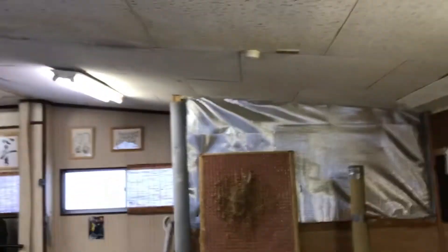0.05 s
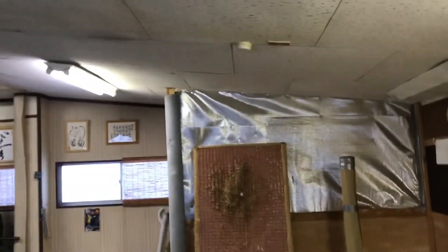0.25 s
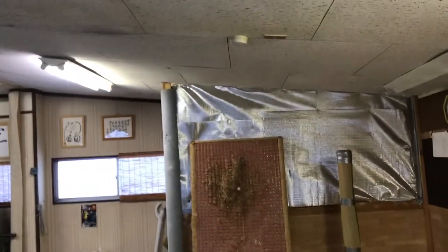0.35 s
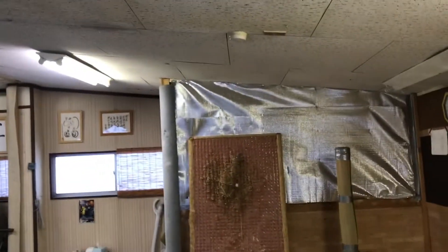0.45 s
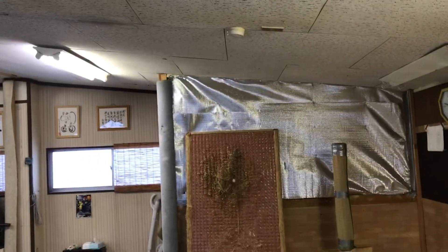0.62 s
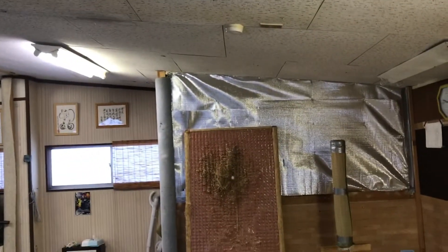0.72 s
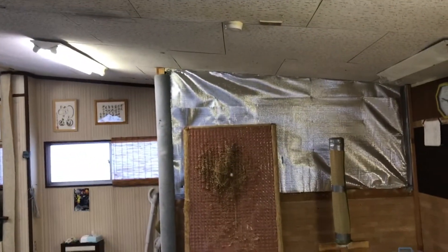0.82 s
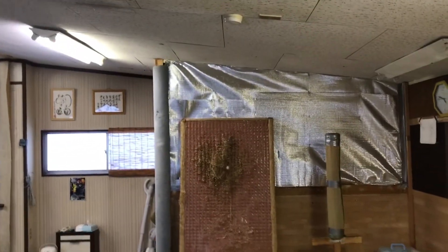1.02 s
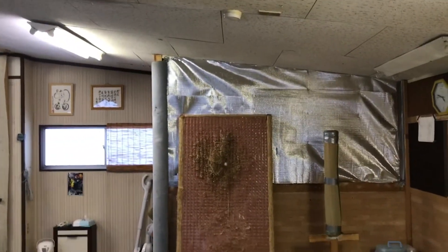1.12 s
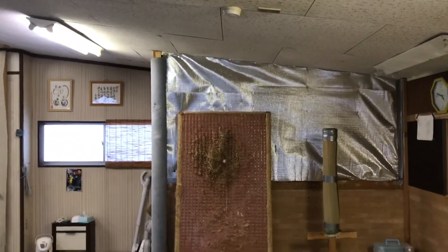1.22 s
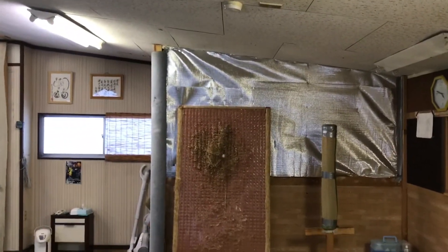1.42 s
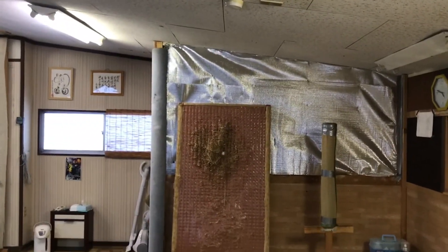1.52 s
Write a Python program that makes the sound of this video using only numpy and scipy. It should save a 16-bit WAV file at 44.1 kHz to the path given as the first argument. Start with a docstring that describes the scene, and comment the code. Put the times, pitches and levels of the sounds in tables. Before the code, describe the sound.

Blade impact on a wooden target, heard from the thrower's side of a small quiet room: faint release clink and swish, one dry crack with low thud, brief echo, then faint ticks, rustling and soft floor thumps.

```python
"""A small steel blade sticks in a padded wooden board across a quiet room: a splintery crack, then a hollow thud.
The crack is short bursts of noise; the thud is dying sine waves for the board and for the room's low boom.
Fading noise makes the short tail from the walls. Shaped noise makes the swish of the sleeve and a later rustle.
Mains hum, rumble and hiss lie underneath, with faint ticks, a clink at release and soft shifts of weight."""
import sys
import numpy as np
from scipy import signal
from scipy.fft import rfft, irfft
from scipy.io import wavfile
from scipy.ndimage import uniform_filter1d

SR = 44100
rng = np.random.default_rng(int(sys.argv[2]) if len(sys.argv) > 2 else 0)


def store_wav(level_fs):
    """Save 16-bit WAV to argv[1]."""
    pcm = np.round(np.clip(np.atleast_2d(level_fs), -1, 1) * 32767)
    wavfile.write(sys.argv[1], SR, pcm.T.astype(np.int16))


def natural_amplitude(level_db):
    """Convert a level in decibels to a linear amplitude factor, elementwise."""
    exponent = np.asarray(level_db, float) / 20
    return 10 ** exponent


N = 68355  # length of the scene [samples]
HIT_S = 0.2266  # the blade meets the board [s]

# Colour of the background air noise: (frequency [Hz], relative level per hertz [dB])
AIR_COLOUR = [(15, -48), (30, -1), (49, -1.5), (100, -5.5), (135, -9.5), (187, -5.5), (230, -9.5),
              (300, -13.5), (530, -19.5), (900, -23), (1500, -26.5), (4500, -33.5), (9500, -36),
              (12000, -33), (14000, -34.5), (15800, -25.5)]
# Slow swell of the bass in the air noise: (time [s], relative level [dB])
RUMBLE_SWELL = [(0, -14), (.08, -0.5), (.15, 2.5), (.5, -3), (.7, 1.5), (1.0, -1.5), (1.15, 4), (1.55, -4)]
# Mains hum, average level: (frequency [Hz], rms level [dB])
HUM_TONES = [(50, -68), (100, -68.5), (197, -74)]
# Colour of rubbing cloth: (frequency [Hz], relative level per hertz [dB])
CLOTH_COLOUR = [(120, -32), (200, -8.5), (311, 1), (480, -17), (900, -12.5), (1500, -12.5), (2000, -24.5),
                (3000, -16), (4300, -17.5), (5500, -25.5), (8100, -26.5), (16000, -20)]
# Swish of the throwing arm: (time [s], relative level [dB])
SLEEVE_CURVE = [(0.005, -61), (0.017, -69), (0.111, -70), (0.117, -67.5), (0.215, -74.5)]
# Clothes settling after the throw: (time [s], relative level [dB])
RUSTLE_CURVE = [(.85, -84), (.95, -82), (1.03, -69.5), (1.12, -74.5), (1.2, -89), (1.33, -74), (1.45, -82),
                (1.55, -81)]
# Thin high ticks: (time [s], relative level [dB])
TICK_TIMES = [(0.0749, -58), (0.3741, -51), (0.5018, -55), (0.9742, -52), (1.169, -59), (1.275, -52),
              (1.3992, -54), (1.438, -47)]
# Tones that make up each tick: frequency [Hz]
TICK_TONES_HZ = [10500, 12000, 13500, 14700, 15500]
# Ringing of the blade as it leaves the fingers: (frequency [Hz], level before the rise [dB], time to fall 60 dB [s])
CLINK_MODES = [(3830, -48, 0.0055), (6100, -40, 0.004)]
# Weight shifts on the floor: (time [s], level before the rise [dB], frequency [Hz])
WEIGHT_SHIFTS = [(0.457, -57.5, 94), (0.746, -55, 70), (1.27, -51.5, 84), (1.432, -54.5, 62.5)]
# Colour of the blow in the room: (frequency [Hz], relative level per hertz [dB])
TAIL_COLOUR = [(120, -24), (180, -3), (300, 3), (500, 1), (620, -7.5), (716, -3.5), (850, -11.5),
               (979, -24.5), (1500, -23.5), (1780, -30), (2200, -17.5), (2650, -26), (3050, -21.5),
               (4200, -32), (5100, -24.5), (5900, -27), (6800, -31.5), (7600, -26.5), (10200, -30.5),
               (12200, -19), (13300, -27), (15500, -16.5)]
# How fast the room goes quiet: (frequency [Hz], time to fall 60 dB [s])
ROOM_DECAY = [(100, 0.57), (420, 0.39), (1100, 0.5), (2900, 0.44), (5500, 0.5), (8000, 0.37), (13000, 0.27)]
# Low room modes: (frequency [Hz], relative level [dB], time to fall 60 dB [s])
BOOM_MODES = [(50.3, -10, 1), (72.2, 5, 0.22), (111, 7.5, 0.11), (132.7, 11, 0.16)]
# Board modes: (frequency [Hz], relative level [dB], time to fall 60 dB [s])
BOARD_MODES = [(193, -2, 0.097), (271, -13, 0.071), (345.6, 10, 0.039), (377.5, -6, 0.14),
               (421.4, -9, 0.24), (461, -3, 0.067), (489, -13, 0.26), (553, -9.5, 0.16), (646, -24, 0.18),
               (715, -3.5, 0.061), (766, -40, 0.049), (1100, -28, .05), (2150, -12, 0.01)]
# Colour of the crack: (frequency [Hz], relative level per hertz [dB])
CRACK_COLOUR = [(700, -31), (1100, -15), (1500, -4.5), (1800, -9.5), (2250, 1), (2900, -18.5), (3700, -3.5),
                (4300, -20.5), (5000, -7), (7000, -12), (10000, -7.5), (12200, -4.5), (13500, -5.5),
                (15200, 4), (16500, -5.5)]
# Echoes of the crack from near walls: (delay after the hit time [s], level relative to the crack [dB])
NEAR_ECHOES = [(.0045, -12), (.0066, -12), (.0096, -9), (.0125, -14)]


def evened(x):
    """Scales a signal to an rms of 1."""
    return x / np.sqrt(np.mean(x ** 2) + 1e-20)


def read(points, hz):
    """Reads a table between its points, along a logarithmic frequency scale."""
    table_hz, value = np.transpose(points)
    return np.interp(np.log(hz + 1), np.log(table_hz + 1), value)


def add(mix, start_s, sound):
    """Adds a sound into the mix at a given time, cut off at the end of the mix."""
    part = mix[round(start_s * SR):][:len(sound)]
    part += sound[:len(part)]


def coloured(points, size):
    """Noise of rms 1 with the given colour."""
    spectrum = rfft(rng.standard_normal(size))
    hz = np.fft.rfftfreq(size, 1 / SR)
    return evened(irfft(spectrum * natural_amplitude(read(points, hz)), size))


def slow_wander(size, smooth):
    """Noise averaged over a number of samples, so that it wanders slowly, with an rms of 1."""
    return evened(uniform_filter1d(rng.standard_normal(size), size=smooth))


def ring(modes, rise_s):
    """Half a second of dying sine waves that all swell up from silence."""
    t = np.arange(SR // 2) / SR
    out = np.zeros(len(t))
    for hz, db, t60_s in modes:
        out += natural_amplitude(db - 60 * t / t60_s) * np.sin(2 * np.pi * hz * t)
    return (1 - np.exp(-t / rise_s)) * out


def air():
    """Rumble and hiss: noise built frame by frame, with drifting patches and a slow swell of the bass."""
    hop, size = 512, 2048  # samples
    frames, hz = N // hop + 5, np.fft.rfftfreq(size, 1 / SR)[:, None]
    real, imaginary, patches = rng.standard_normal((3, len(hz), frames))
    patches = uniform_filter1d(patches, size=20, axis=0)  # smooth over frequency
    patches = evened(uniform_filter1d(patches, size=6, axis=1))  # smooth over time
    swell_db = np.interp(np.arange(frames) * hop / SR, *np.transpose(RUMBLE_SWELL))
    bass_share = 1 / (1 + (hz / 152) ** 2)  # the swell fades out above about 152 Hz
    level_db = read(AIR_COLOUR, hz) + 0.91 * patches + swell_db * bass_share
    spectrum = (real + 1j * imaginary) * natural_amplitude(level_db)
    noise = signal.istft(spectrum, nperseg=size, noverlap=size - hop)[1][:N]
    return natural_amplitude(-61) * evened(noise)


def hum():
    """Mains hum: steady sine waves whose loudness wavers slightly."""
    t = np.arange(N) / SR
    out = np.zeros(N)
    for hz, db in HUM_TONES:
        level = np.sqrt(2) * natural_amplitude(db + 1.2 * slow_wander(N, smooth=6000))  # sqrt(2) turns rms into peak
        out += level * np.sin(2 * np.pi * (hz * t + rng.random()))
    return out


def cloth(curve, rise_db_per_s, fall_db_per_s, extra_db, grain_db):
    """Rubbing cloth: grainy noise whose loudness follows the movement."""
    s, db = np.transpose(curve)
    t = np.arange(N) / SR
    level_db = np.interp(t, s, db) + extra_db
    level_db -= rise_db_per_s * np.maximum(s[0] - t, 0)  # before the first point
    level_db -= fall_db_per_s * np.maximum(t - s[-1], 0)  # after the last point
    grain = slow_wander(N, smooth=300)
    return natural_amplitude(level_db + grain_db * grain) * coloured(CLOTH_COLOUR, N)


def clothes():
    """The sleeve swishes with the throw, then the clothes settle."""
    swish = cloth(SLEEVE_CURVE, 0, 150, extra_db=5, grain_db=1.45)
    rustle = cloth(RUSTLE_CURVE, 60, 0, extra_db=-0.5, grain_db=2.5)
    return swish + rustle


def weight_shifts():
    """Soft floor thumps: one low, quickly dying sine wave for each."""
    out = np.zeros(N)
    for start_s, db, hz in WEIGHT_SHIFTS:
        add(out, start_s, ring([(hz, db, 0.27)], rise_s=0.0028))
    return out


def ticks():
    """Thin ticks: very short bundles of high tones, each tone 2 dB louder than the one below."""
    out = np.zeros(N)
    for start_s, db in TICK_TIMES:
        tones = [(hz, db - 12 + 2 * k, 0.005) for k, hz in enumerate(TICK_TONES_HZ)]
        add(out, start_s, ring(tones, rise_s=0.0001))
    return out


def clink():
    """The blade rings for a moment as it leaves the fingers."""
    out = np.zeros(N)
    add(out, 0.012, ring(CLINK_MODES, rise_s=0.00021))
    return out


def room_tail():
    """Dense echoes of the blow from the walls: noise in which each band dies at its own speed."""
    start_s, rise_s, level_db = 0.003, 0.0031, -36
    noise = coloured(TAIL_COLOUR, SR)
    hz, t, spectrum = signal.stft(noise, SR, nperseg=512, noverlap=384)
    fade_db = -60 * t / read(ROOM_DECAY, hz)[:, None]
    tail = signal.istft(spectrum * natural_amplitude(fade_db), SR, nperseg=512, noverlap=384)[1]
    tail *= natural_amplitude(1.2 * slow_wander(len(tail), smooth=120))  # scattered late echoes
    rise = 1 - np.exp(-np.arange(len(tail)) / SR / rise_s)
    out = np.zeros(N)
    add(out, HIT_S + start_s, natural_amplitude(level_db) * rise * tail)
    return out


def thud():
    """The board's wood rings hollow and sets off the slower boom of the room's low modes."""
    board = natural_amplitude(-28.5) * ring(BOARD_MODES, rise_s=0.0025)
    boom = natural_amplitude(-35) * ring(BOOM_MODES, rise_s=0.011)
    out = np.zeros(N)
    add(out, HIT_S + 0.00208, board + boom)
    return out


def crack():
    """Wood splinters under the blade: a short burst of tearing noise and its first echoes."""
    bite_s, t60_s, level_db = 0.0022, 0.006, -32  # full strength until bite_s, then a fast fade
    t = np.arange(1024) / SR
    shape = np.minimum(t / 0.0003, 1) * natural_amplitude(-60 * np.maximum(t - bite_s, 0) / t60_s)
    out = np.zeros(N)
    for delay_s, db in [(0.00075, 0)] + NEAR_ECHOES:
        burst = shape * coloured(CRACK_COLOUR, 1024)
        burst *= np.linalg.norm(shape) / np.linalg.norm(burst)  # same energy for every random burst
        add(out, HIT_S + delay_s, natural_amplitude(level_db + db) * burst)
    return out


def scene():
    """Adds all the layers into one channel."""
    background = air() + hum()
    small_sounds = clothes() + weight_shifts() + ticks() + clink()
    blow = room_tail() + thud() + crack()
    return (background + small_sounds + blow)[None]


def roll_off(x):
    """The treble ends steeply here."""
    return signal.sosfilt(signal.butter(12, 16820, fs=SR, output="sos"), x)


def record(dry):
    """The microphone drops the deepest bass (below 38 Hz) and the top treble (above 15800 Hz)."""
    low_cut = signal.butter(2, 38, "high", fs=SR, output="sos")
    treble_cut = signal.firwin(401, 15800, window=("kaiser", 8), fs=SR)
    mix = signal.sosfilt(low_cut, dry)
    mix = signal.oaconvolve(mix, treble_cut[None], "same")
    return roll_off(mix)


dry = scene()
out = record(dry)
store_wav(out)
```